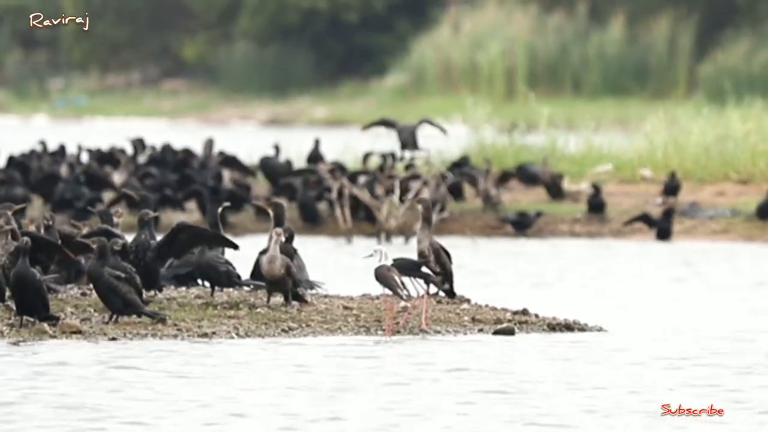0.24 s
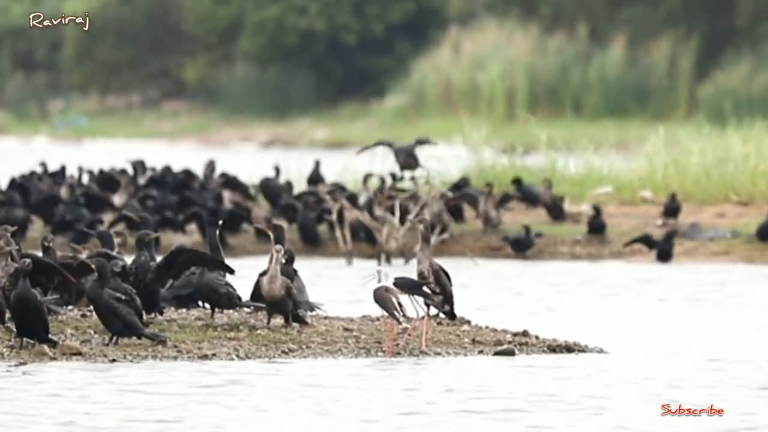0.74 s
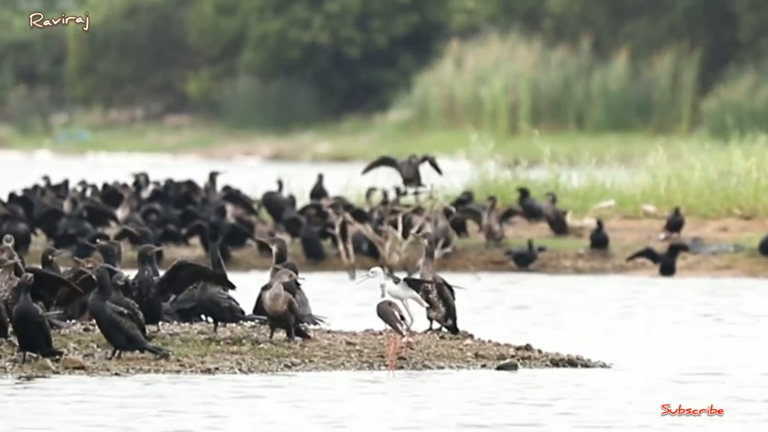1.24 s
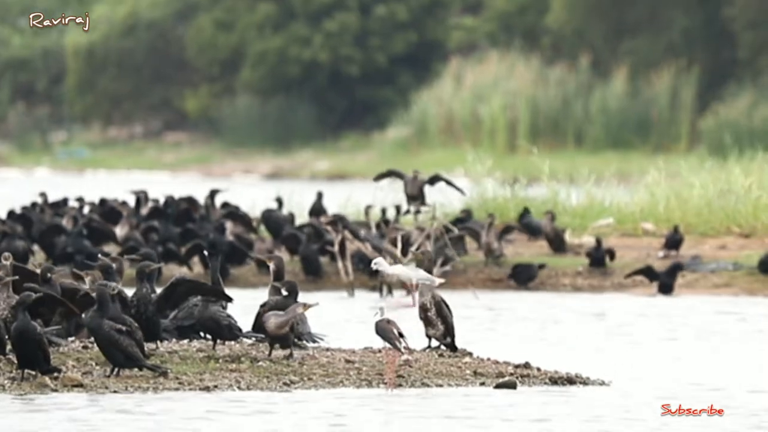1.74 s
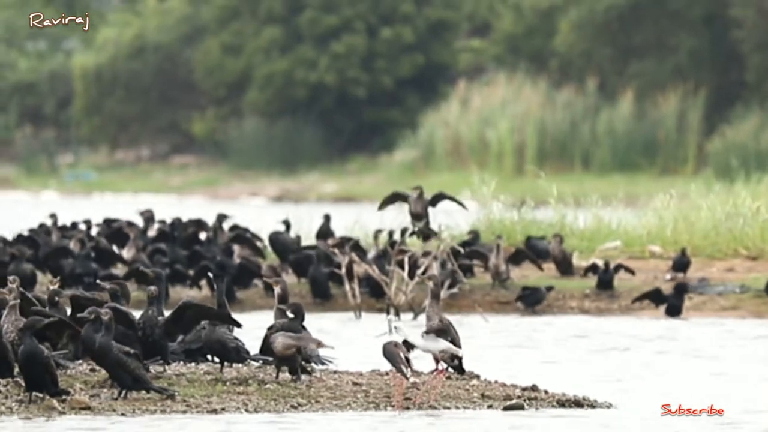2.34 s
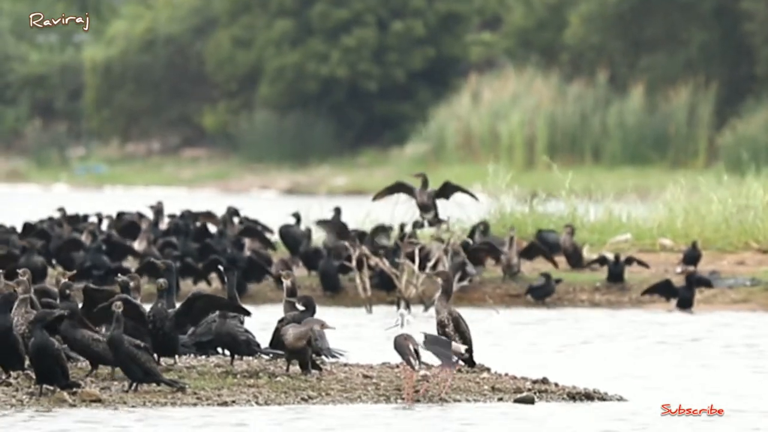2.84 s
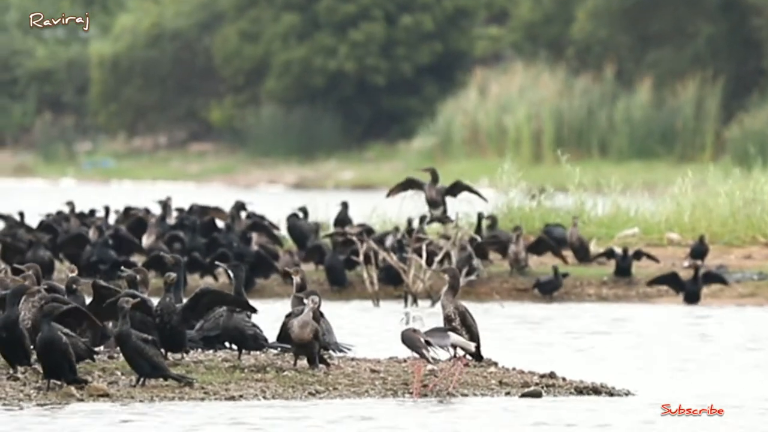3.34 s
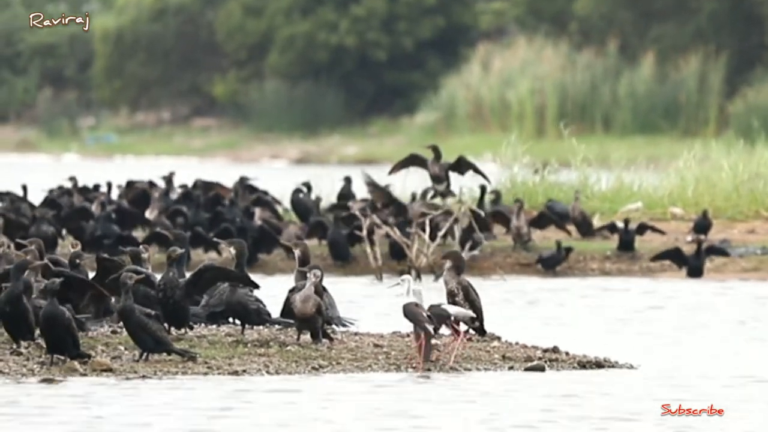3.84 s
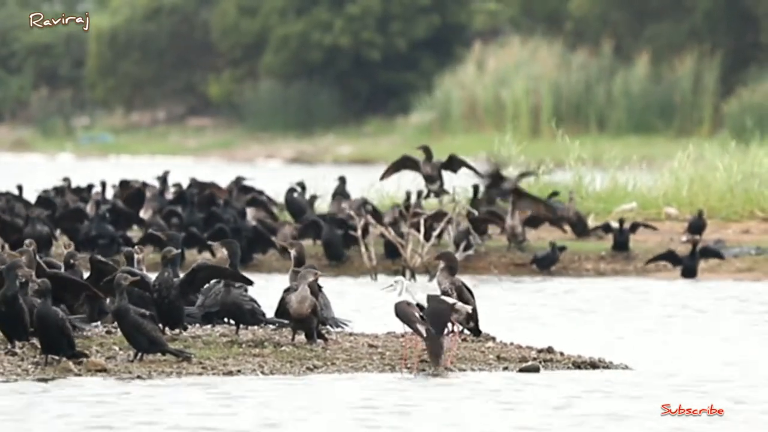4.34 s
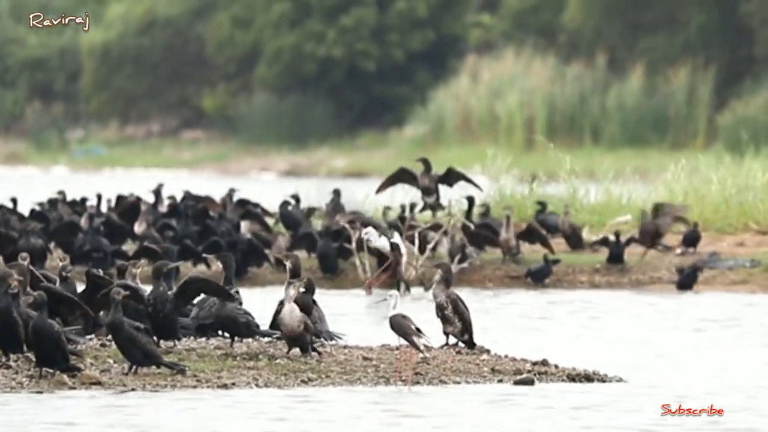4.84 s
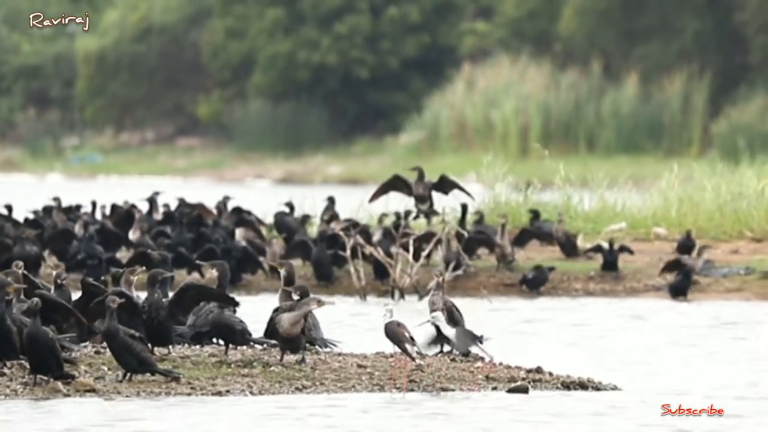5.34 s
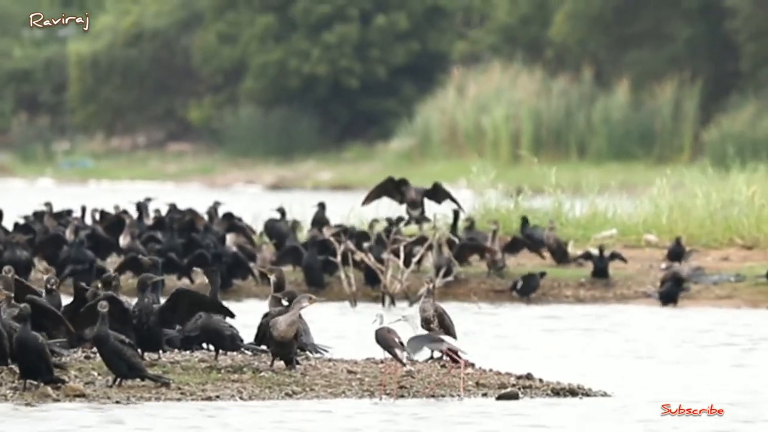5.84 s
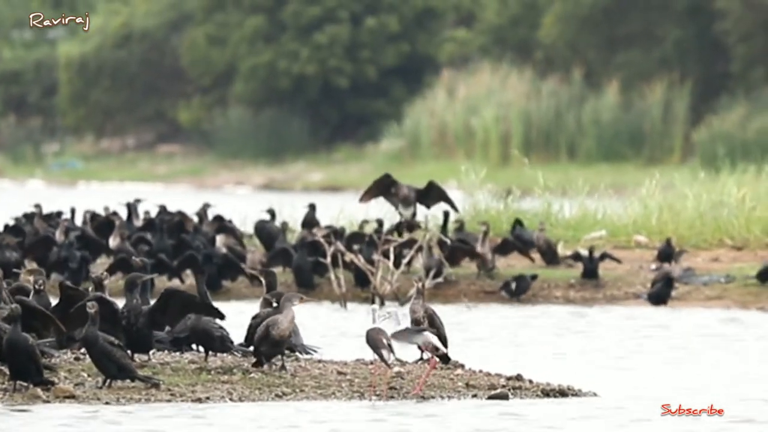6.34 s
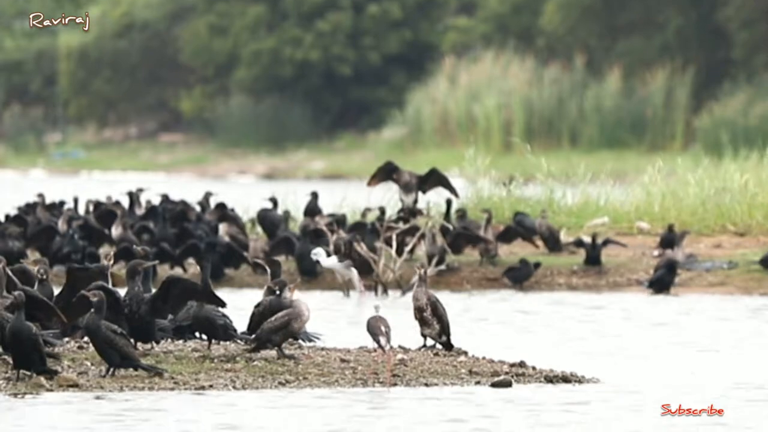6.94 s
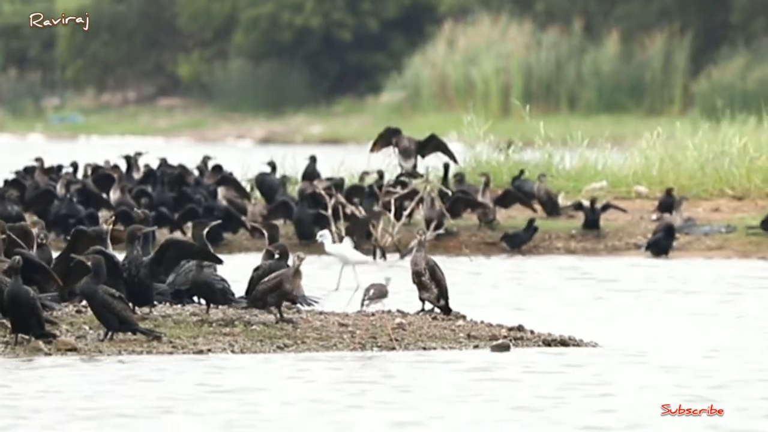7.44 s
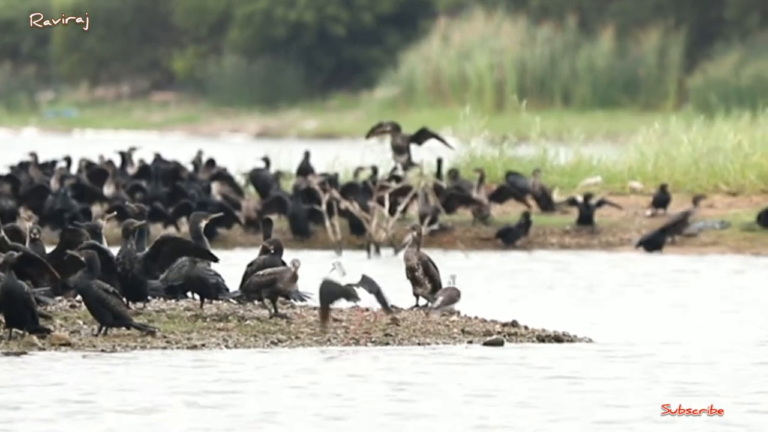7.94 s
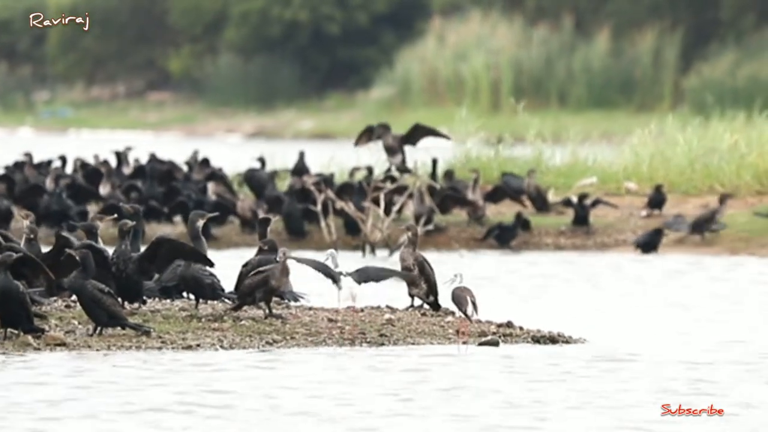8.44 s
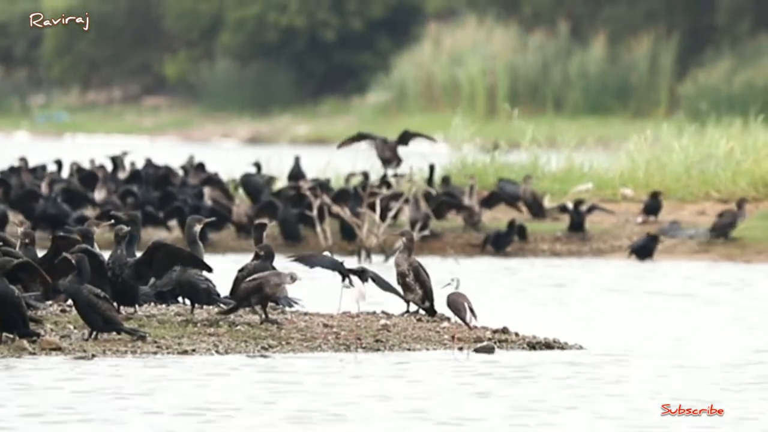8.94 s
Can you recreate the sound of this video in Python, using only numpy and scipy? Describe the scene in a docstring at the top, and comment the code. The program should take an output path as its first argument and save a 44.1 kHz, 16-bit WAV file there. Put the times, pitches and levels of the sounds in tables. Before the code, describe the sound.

Two long-legged wading birds quarrel close by with sharp yelps and fluttering rolled calls, over soft flock murmur and water, wind thudding the microphone.

```python
"""Lake shore, two long-legged waders quarrelling close by: a rolled call is already sounding at the start,
then arched yelps and fluttering rolls, both stacks of partials coloured by a throat, trade to the end.
Three dry taps fall, near 0.6, 3.7 and 5.2 s; gusts thud on the two ports of a camera microphone, hardest
from 1.3 to 1.65 s, as clusters of ringing pushes. From 2.2 s a small bird twitters far off in near-sines, again
from 5.1 s. Behind lie flock murmur, water and hiss (drifting random spectra) and a fuzzy band of insects."""
import sys
import numpy as np
from scipy import signal
from scipy.fft import rfft, irfft
from scipy.io import wavfile
from scipy.ndimage import uniform_filter1d

SR = 44100
rng = np.random.default_rng(int(sys.argv[2]) if len(sys.argv) > 2 else 0)


def generate_wav(signal):
    """Clip the signal to [-1, 1] and save it as 16-bit WAV at the path in sys.argv[1]."""
    frames = np.transpose(np.atleast_2d(signal))
    scaled = np.clip(frames, -1, 1) * 32767
    pcm = np.round(scaled).astype(np.int16)
    wavfile.write(sys.argv[1], SR, pcm)


N = 405719  # length in samples

# Near wader, yelps: start t/s, length t/s, rise to the top t/s, top level/dB, start f/Hz (before the scoop),
# top f/Hz (before the scoop), share of pitch lost in a register break, end f/Hz,
# extra treble above 3 kHz at the top level/dB per octave
YELP_CALLS = [ (0.398, 0.085, 0.041, -34.5, 1260, 1314, 0, 950, 3),
              (0.886, 0.091, 0.048, -33, 1154, 1295, 0.11, 1026, 14),
              (1.482, 0.097, 0.039, -34.5, 1340, 1422, .25, 762, 13.5),
              (1.811, 0.11, 0.047, -38.5, 974, 1163, 0, 770, 9),
              (2.376, 0.097, 0.033, -32.5, 990, 1113, 0, 770, 0.5),
              (2.877, 0.081, 0.041, -33.5, 1224, 1290, 0, 1100, 12.5),
              (3.23, 0.092, 0.047, -35.5, 1234, 1390, 0.26, 736, 8),
              (3.711, 0.093, 0.039, -36.5, 1302, 1364, 0, 983, 3.5),
              (4.194, 0.091, 0.027, -33.5, 1156, 1234, 0, 1030, 7.5),
              (4.657, 0.075, 0.036, -32.5, 1224, 1279, 0, 910, 8),
              (5.187, 0.091, 0.033, -33.5, 1316, 1462, 0.22, 790, 8.5),
              (5.547, 0.097, 0.03, -33.5, 1210, 1473, 0.17, 763.6, 10),
              (6.139, 0.069, 0.025, -31, 1133, 1400, 0, 930, 10.5),
              (6.576, .077, 0.046, -29, 1266, 1324, 0.34, 805, 13),
              (6.878, 0.08, 0.036, -30, 1403, 1463, 0.21, 950, 14),
              (7.266, 0.1, 0.019, -33.5, 1065, 1131, 0, 703, 8),
              (7.814, 0.099, 0.025, -35, 892, 1143, 0, 705, 6),
              (8.153, 0.1, 0.038, -33, 1340, 1483, 0.21, 685, 10),
              (8.591, 0.09, 0.044, -34, 1300, 1384, 0, 1046, 6.5),
              (9.004, 0.092, 0.045, -34, 1363, 1487, 0.3, 676, 10), ]
# Throat colour of the yelping bird: f/Hz, relative level/dB
YELP_THROAT_COLOUR = [(350, -53), (600, -14), (1080, -9.5), (1450, -11), (2020, 3), (2830, 0.5),
                      (3590, 0.5), (4510, -10.5), (5990, -21), (6480, -26.5), (9000, -77), (11700, -49),
                      (19800, -120)]
# Moments when a yelp turns hoarse: from t/s, to t/s
HOARSE_SPANS = [(1.51, 1.526), (5.212, 5.228), (6.622, 6.636), (1.815, 1.832), (2.386, 2.428)]
YELP_SWELL_DB, YELP_FADE_DB = 2.5, 8  # gained up to the top, lost after it
BREAK_DB, LOW_FADE_DB, BREAK_S = 5.5, 3.5, 0.0089  # the low register is quieter and fades less
YELP_RISE, YELP_FALL, LOW_FALL, FADE_CURVE = 2.08, 1.9, 1, 0.7  # powers of the arches
YELP_DULLING = 0.89  # treble lost, dB an octave, for each dB below the top


def yelp(start, length, rise_s, top_db, start_hz, top_hz, drop, end_hz, tilt_db):
    """Clean arches; in the high register strong and weak cycles alternate, adding lines at half the pitch."""
    u = np.arange(0, length, 1 / SR)
    t = start + u
    broken = drop > .1
    after_hz = top_hz * (1 - drop * broken)
    hz = arch(u, rise_s, start_hz, top_hz, after_hz, end_hz, YELP_RISE, LOW_FALL if broken else YELP_FALL)
    hz = uniform_filter1d(hz, size=70, mode="nearest")  # the break is a quick flip
    hz = hz * (1 - 0.056 * np.exp(-u / 0.0077))  # the voice scoops up to its pitch

    after_db = top_db - BREAK_DB * broken
    end_db = after_db - (LOW_FADE_DB if broken else YELP_FADE_DB)
    level_db = arch(u, rise_s, top_db - YELP_SWELL_DB, top_db, after_db, end_db, 1.0, FADE_CURVE)
    level_db = uniform_filter1d(level_db, round(BREAK_S * SR), mode="nearest")
    tilt_db = tilt_db - YELP_DULLING * (top_db - level_db)

    hoarse = sum((t > first) & (t < last) for first, last in HOARSE_SPANS)
    hoarse = uniform_filter1d(hoarse * 1., size=150)
    multiples = np.arange(2, 16) / 2
    half_db = -26 + 21 * np.clip((hz - 1170) / 130, 0, 1)  # half lines grow as the pitch climbs
    half_db = half_db + hoarse * (-3 - half_db)
    half_db = half_db - 7 * abs(multiples[:, None] - 2.6) - 1
    weights = np.where(multiples[:, None] % 1 > 0, amp(half_db), 1)
    voice = stack(hz, YELP_THROAT_COLOUR, tilt_db, multiples, weights, 0.14 + 0.26 * hoarse)
    return amp(level_db) * edges(t, 0.0037, 0.0053) * voice


# Near wader, rolled calls: start t/s, length t/s, opening level/dB, body level/dB, start f/Hz,
# rise to the top t/s, top f/Hz, end f/Hz, first shut of the throat after the start t/s, beats f/Hz,
# extra treble above 3 kHz level/dB per octave, clear opening t/s, depth of the roll 0-1
ROLLED_CALLS = [ (-.02, 0.087, -34.5, -37, 1215, 0.094, 1318, 1270, 0.0052, 46, -19, 0.027, 0.48),
                (0.932, 0.15, -46, -40, 1260, 0.012, 1264, 1134, 0.0036, 95, -2.5, .01, 0.6),
                (1.252, 0.2, -28.5, -40, 1196, 0.069, 1280, 1160, 0.0052, 79, 0, 0.037, 0.66),
                (1.604, .21, -28.5, -41.5, 1120, 0.056, 1290, 1117, 0.014, 91, 3.5, 0.033, 0.7),
                (2.023, .15, -28.5, -33.5, 960, 0.11, 1230, 1250, 0.0092, 81, -1, 0.037, 0.52),
                (2.467, 0.02, -34, -41, 980, 0.016, 1095, 1086, .0036, 82, -12, 0.018, .3),
                (2.739, 0.07, -26, -35, 962, 0.065, 1200, 1240, 0.0047, 88, -3.5, 0.032, 0.56),
                (3.387, 0.055, -31.5, -43, 985, 0.028, 1260, 1220, .0015, 79, -2, .033, .7),
                (4.255, 0.14, -32, -40, 1022, 0.048, 1115, 1040, 0.004, 72, -13, 0.022, 0.57),
                (4.385, 0.072, -40, -37.5, 1056, 0.03, 1057, 1002, 0.016, 82, -19, 0.0071, 0.65),
                (4.828, 0.14, -33.5, -40, 1102, 0.11, 1270, 1220, 0.0084, 78, 0, 0.021, 0.83),
                (4.978, .13, -34, -31.5, 1273, 0.022, 1280, 1090, 0.0018, 81, 6, 0.0076, 0.53),
                (5.307, 0.16, -28, -32.5, 1110, 0.021, 1110, 1056, 0.012, 85, 1.5, 0.029, 0.39),
                (6.523, 0.068, -26, -37, 1065, 0.025, 1106, 1140, 0.0042, 80, -2.5, 0.031, 0.9),
                (6.958, 0.046, -26.5, -52, 1124, .021, 1135, 1140, 0.0017, 90, 2, 0.018, 0.72),
                (7.009, 0.066, -35, -27, 1140, 0.063, 1220, 1205, 0.0071, 91, 2, 0.0056, 0.7),
                (7.096, .12, -35, -28.5, 1156, 0.06, 1205, 1180, 0.0086, 92, 5.5, 0.0049, 0.9),
                (7.23, 0.07, -30, -29, 1220, 0.0074, 1244, 1090, 0.003, 79, 4.5, 0.0043, 0.59),
                (7.451, .24, -27.5, -38.5, 1006, 0.15, 1172, 1100, 0.00054, 80, 5, 0.0308, 0.71),
                (9.179, 0.016, -31, -39, 880, 0.019, 1044, 1080, 0.0063, 75, -1.5, 0.0094, 0.5), ]
# Throat colour of the rolling bird: f/Hz, relative level/dB
ROLL_THROAT_COLOUR = [(530, -46), (900, -17), (1200, -8.5), (2300, 7), (3480, 1.5), (4150, -4), (4800, -5),
                      (5750, -5), (6700, -17), (9720, -50), (11100, -38), (13000, -60)]
# A second push of breath inside a rolled call: middle t/s, gain level/dB, half length t/s, depth taken away
BREATH_SURGES = [(1.035, 8, 0.035, 0.37), (1.76, 13, 0.061, 0.35), (4.35, 8, 0.026, 0.27),
                 (4.895, 10, 0.016, 0.68), (4.936, 13, 0.021, 0.2), (7.049, 4.5, 0.014, 0.28),
                 (7.145, 7, 0.0091, 0.73), (7.628, 13.5, 0.087, 0.29), (0.046, 3, 0.015, 0.18)]
OPENING_S, ROLL_FADE_DB, ROLL_FADE_CURVE = 0.043, 12.5, 3
ROLL_RISE, ROLL_FALL = 2.5, 1.1  # powers of the arch
PITCH_WAVER, DEPTH_WAVER = .007, .09  # chance wander: share of the pitch, and depth
DEEPER_PER_FADE_DB = .025  # the roll (depth 0-1) gets deeper with each dB of fade
HALF_PER_DEPTH, THINNING = .3, 0.59  # a deep roll splits the voice and leaves the third partial in front
PUFF_S, PUFF_DB = 0.0051, -13  # a faint hoarse puff comes before the voice sets in


def roll(start, length, opening_db, body_db, start_hz, rise_s, top_hz, end_hz,
         shut_s, per_s, tilt_db, clear_s, depth):
    """The throat flutters: each beat chokes the tone, a rasp slides up through the gap, the tone restarts split."""
    t = np.arange(0, length, 1 / SR)
    hz = arch(t, rise_s, start_hz, top_hz, top_hz, end_hz, ROLL_RISE, ROLL_FALL)
    hz = hz * (1 + PITCH_WAVER * drift(len(t), size=600))

    head_db = (opening_db - body_db) * np.exp(-(t / OPENING_S) ** 2)
    fade_db = ROLL_FADE_DB * (t / length) ** ROLL_FADE_CURVE
    surge_db, calm = sum([[db], [less]] * np.exp(-((start + t - s) / half_s) ** 2)
                         for s, db, half_s, less in BREATH_SURGES)
    level_db = body_db + head_db + surge_db - fade_db
    depth = depth - calm + DEEPER_PER_FADE_DB * fade_db
    depth = depth * (1 - np.exp(-(t / clear_s) ** 6))  # the opening stays clear
    depth = np.clip(depth + DEPTH_WAVER * drift(len(t), size=700), 0, 1)

    beats = per_s * (t - shut_s) + .04 * drift(len(t), size=500)
    beat = beats % 1
    luck = rng.random((2, 40))[:, np.floor(beats).astype(int) % 40]  # one pair of draws per beat
    choke = np.exp(-(np.minimum(beat, 1 - beat) / (0.12 + .2 * depth)) ** 2)
    throb = 1 - np.clip(1.6 * depth, 0, .97) * choke
    throb = throb / np.sqrt(uniform_filter1d(throb ** 2, size=540))
    throb = throb * amp(4.4 * depth * uniform_filter1d(luck[0] - .5, size=60))  # uneven beats
    restart = uniform_filter1d(np.exp(-beat / .28) * (.6 + .7 * luck[1]), size=40)
    restart = restart * np.clip(1.5 * depth, 0, 1)

    multiples = np.arange(2, 24) / 2
    puff = np.clip((PUFF_S - t) * 1000 + .5, 0, 1)
    split = puff + HALF_PER_DEPTH * depth + 0.45 * restart
    split = split * np.exp(-((multiples[:, None] - 3.1) / 1.7) ** 2)  # half lines near the throat peak
    whole = 1 - THINNING * depth * (multiples[:, None] != 3)
    weights = np.where(multiples[:, None] % 1 > 0, split, whole)
    fuzz = .08 + .27 * depth + puff
    tone = stack(hz * (1 - .09 * restart), ROLL_THROAT_COLOUR, tilt_db, multiples, weights, fuzz)
    voice = throb * tone + rasp(hz, tilt_db, beats, depth, luck[1])
    return amp(level_db + PUFF_DB * puff) * edges(t, 0.0023, 0.0062) * voice


# The lead and span are shares of a beat, the sag a share of the pitch
RASP_LEAD, RASP_SPAN, RASP_SAG, RASP_DB = .12, .6, .18, -1.5


def rasp(hz, tilt_db, beats, depth, luck):
    """A rough group of upper partials that starts before each shut of the throat and slides up in pitch."""
    slip = np.clip((beats + RASP_LEAD) % 1 / RASP_SPAN, 0, 1)
    sliding_hz = hz * (1 - RASP_SAG * (1 - slip))
    multiples, weights = np.array([3, 3.5, 4, 5]), [[1], [.4], [1], [.3]]
    rough = stack(sliding_hz, ROLL_THROAT_COLOUR, tilt_db, multiples, weights, .33)
    strength = np.clip(2 * depth, 0, 1) * uniform_filter1d(0.63 + 0.7 * luck, size=90)
    return amp(RASP_DB) * strength * np.sin(np.pi * slip) * rough


def stack(hz, throat, tilt_db, multiples, weights, fuzz):
    """Partials of the syrinx coloured by the throat; each shimmers a little on its own."""
    order = multiples[:, None]
    turns, partial_hz = np.cumsum(hz) / SR, order * hz
    treble_db = tilt_db * np.log2(np.maximum(partial_hz / 3000, 1))
    gains = amp(read(throat, partial_hz) + treble_db) * weights
    gains = gains * amp(2.4 * drift(gains.shape, size=450))  # the beak moves: partials swell in turn
    gains = gains / np.sqrt((gains ** 2).sum(0) / 2)
    shimmer = 1 + fuzz * (drift(gains.shape, size=30) + 1j * drift(gains.shape, size=30))
    waves = -np.exp(1j * order * (2 * np.pi * turns - 0.12 * order))
    return (gains * shimmer * waves).real.sum(0)


def arch(u, rise_s, start, top, after, end, up, down):
    """Climbs from start to top, then sinks from after to end."""
    climb = np.clip(1 - u / rise_s, 0, 1)
    sink = np.clip((u - rise_s) / (u[-1] - rise_s + 1e-4), 0, 1)
    return np.where(u < rise_s, top - (top - start) * climb ** up, after - (after - end) * sink ** down)


# Rumble of the wind at the microphone: t/s, level/dB
GUST_LEVELS = [(0, -44.5), (1.2, -47), (1.3, -30), (1.65, -34.5), (1.85, -61.5), (2.3, -55.5), (3.4, -48),
               (3.7, -42), (3.9, -53), (4.3, -45.5), (4.7, -48), (5.3, -45.5), (5.55, -50), (6.25, -51),
               (6.43, -39), (6.8, -47.5), (7.9, -42), (8.1, -46.5), (9.2, -46)]
# Strong eddies on the ports: middle t/s, level/dB, left-right level/dB, length t/s (window is 2.2 times this,
# 4000 samples at most), f/Hz
EDDY_THUDS = [(0.288, -30, 5, 0.024, 264), (0.564, -26.5, 10, 0.05, 289), (0.711, -33.5, -1, 0.017, 128),
              (0.824, -30.5, 6, 0.038, 178), (1.011, -24, 13.5, 0.0066, 280), (1.03, -28.5, 13, 0.013, 214),
              (1.287, -22.5, 17.5, 0.0098, 262), (1.313, -23, -1, 0.01, 230),
              (1.326, -21.5, 14, 0.0065, 404), (1.338, -18.5, 5, 0.011, 290), (1.355, -15.5, 3, 0.019, 276),
              (1.385, -26, 14, 0.0059, 374), (1.394, -21.5, 11, .01, 223), (1.404, -30, -13, 0.007, 327),
              (1.434, -26, 15.5, .008, 304), (1.478, -16, 9, .014, 202), (1.496, -28, -17.5, 0.0057, 396),
              (1.508, -22.5, -14, 0.0122, 230), (1.524, -27.5, -9, 0.009, 181),
              (1.605, -23.5, -14.5, 0.014, 258), (1.64, -26, -12, 0.008, 270),
              (1.655, -29, -7, 0.0094, 195), (3.491, -30.5, 7, 0.033, 149), (3.66, -31, 10, 0.039, 176),
              (3.724, -28.5, 11, 0.05, 228), (4.225, -26.5, 8, 0.047, 200), (4.317, -33, -11, 0.0291, 147),
              (4.362, -28.5, -9, 0.028, 190), (5.215, -37.5, 24, 0.054, 163), (5.261, -26, 19.5, 0.05, 172),
              (5.33, -25.5, 10, 0.036, 253), (5.387, -28, 9, 0.025, 241), (6.41, -24, 5, 0.0389, 112),
              (6.434, -20.5, 13.5, 0.05, 288), (6.704, -28, 7.5, 0.037, 140), (7.337, -30.5, 8, 0.03, 223),
              (7.356, -27.5, 12.5, .007, 292), (7.372, -30, 11, 0.0083, 273), (7.783, -27, 4.5, 0.05, 203),
              (8.613, -33, 10, 0.02, 210)]
# Colour of the rumble: f/Hz, relative level/dB per Hz
WIND_COLOUR = [(12, -80), (20, -31.5), (95, -4), (198, -2.5), (275, -6), (394, -8.5), (1500, -44.5),
               (1950, -60), (3300, -120)]


def wind():
    """A lumpy rumble on each port; strong eddies are short clusters of pushes, each ringing a cycle or two."""
    s, level_db = np.transpose(GUST_LEVELS)
    t, hz = np.arange(N) / SR, np.fft.rfftfreq(N, 1 / SR)
    own, shared = rng.standard_normal((2, N)), rng.standard_normal(N)
    lumps = amp(1.25 * drift((2, N), size=500) + 2.2 * drift(N, size=900))
    rumble = evened(irfft(rfft((own + 1.75 * shared) * lumps) * amp(read(WIND_COLOUR, hz)), N))
    out = rumble * amp(np.interp(t, s, level_db) + np.array([[1.2], [-1.2]]))
    draws = rng.random((len(EDDY_THUDS), 3, 4000))
    for (middle, db, pan_db, length, thud_hz), draw in zip(EDDY_THUDS, draws):
        burst = eddy(length, thud_hz, draw)
        power = uniform_filter1d(burst ** 2, size=600).max(1, keepdims=True)
        port_db = db + np.array([[.5], [-.5]]) * pan_db
        add(out, middle - len(eddy_window(length)) / 2 / SR, amp(port_db) * burst / np.sqrt(power))
    return out


def eddy_window(length):
    """The swell and ebb of one cluster of pushes."""
    return np.hanning(min(round(2.2 * length * SR), 4000))


def eddy(length, thud_hz, draw):
    """Pushes at chance moments, partly shared by the ports, each ringing briefly at the thud's pitch."""
    window, u = eddy_window(length), np.arange(1200) / SR
    draw = draw[:, :len(window)]
    pushes = (draw < 250 / SR) * (draw * SR / 125 - 1)  # about 250 a second, heights from -1 to 1
    pushes[:, len(window) // 2 - 80] = 0.65  # one sure push near the middle
    pushes = (pushes[:2] + 0.11 * pushes[2]) * window
    turns = thud_hz * u
    push = turns ** 1.94 * np.exp(-turns / 0.23) * np.cos(2 * np.pi * turns)
    burst = signal.fftconvolve(pushes, push[None], axes=1)
    bass_cut = signal.butter(2, 0.35 * thud_hz, "high", fs=SR, output="sos")
    return signal.sosfilt(bass_cut, burst)  # small eddies lack bass


# Phrase of the far bird: t/s from its start, f/Hz, relative level/dB
TWITTER_PHRASE = [(0, 3710, -2), (.008, 4330, 1), (.018, 4170, -2), (.021, 4850, -6), (.027, 4730, -4),
                  (.037, 4290, 4), (.044, 4550, -6), (.052, 4630, 4.5), (.068, 3070, -1)]
# Far twitters: start t/s, level/dB
TWITTER_STARTS = [(2.176, -49.5), (2.555, -53.5), (2.964, -49.5), (5.086, -52), (5.44, -55), (5.769, -54),
                  (6.107, -50), (6.418, -51)]
# Thin single whistles: start t/s, length t/s, start f/Hz, end f/Hz, level/dB
THIN_WHISTLES = [(2.478, .02, 6700, 6140, -53), (3.616, 0.098, 5200, 4340, -49.5)]
# Dry taps: start t/s, level/dB of the tone before its decay, f/Hz
DRY_TAPS = [(0.627, -34.5, 1680), (3.661, -32.5, 1390), (5.163, -29.5, 1490)]


def far_birds():
    """Near-sine twitters and whistles, with three dry taps."""
    out = np.zeros(N)
    t, hz, shape_db = columns(TWITTER_PHRASE)
    for s, db in TWITTER_STARTS:
        add(out, s, amp(db + shape_db) * edges(t, .003, 0.0027) * sweep(hz))
    for s, length, start_hz, end_hz, db in THIN_WHISTLES:
        glide = np.linspace(start_hz, end_hz, round(length * SR))
        add(out, s, amp(db) * signal.windows.tukey(len(glide), .6) * sweep(glide))
    u = np.arange(900) / SR
    for s, db, tap_hz in DRY_TAPS:
        crack = .3 * drift(len(u), size=5) * np.exp(-u / .007)
        knock = np.sin(2 * np.pi * tap_hz * u) * np.exp(-u / 0.0034)
        add(out, s, amp(db) * np.clip(u / 0.00035, 0, 1) * (crack + knock))
    return out


def echoes(x):
    """Scatter from water and reeds: a short tail of sparse taps, other taps for each port."""
    t = np.arange(6000) / SR
    sparse = rng.standard_normal((2, len(t))) * (rng.random((2, len(t))) < .05)
    taps = sparse * amp(-60 * t / 0.11) * (t > .002)
    return signal.oaconvolve(x[None], taps / np.linalg.norm(taps[0]), axes=1)[:, :N]


# Colour of the shore: f/Hz, relative level/dB per Hz
SHORE_COLOUR = [(18, -57), (30, -28), (53, -17.5), (243, -5), (277, -2.5), (379, -15.5), (575, -10.5),
                (747, -6), (1440, -7.5), (1720, -11.5), (3400, -17), (3770, -18), (4190, -17),
                (8710, -27.5), (15500, -47)]
# Likeness of the two ports: f/Hz, left-right likeness (1 is the same)
PORT_LIKENESS = [(100, 1), (500, 0.76), (1500, 0.011), (4000, 0.036), (10000, 0.043)]
SHORE_DB = -46


def shore():
    """Flock murmur, water and far hiss: random short-time spectra with drifting patches."""
    frames, hz = N // 256 + 5, np.fft.rfftfreq(1024, 1 / SR)
    a, b, c, d, patches = rng.standard_normal((frames, 513, 5)).T
    patches = evened(uniform_filter1d(uniform_filter1d(patches, size=10, axis=0), size=10, axis=1))
    same = np.clip(read(PORT_LIKENESS, hz), -1, 1)[:, None]
    left = a + 1j * b
    right = same * left + np.sqrt(1 - same ** 2) * (c + 1j * d)
    level_db = read(SHORE_COLOUR, hz)[:, None] + 1.52 * patches + 0.058 * drift(frames, size=40)
    spectra = np.array([left, right]) * amp(level_db)
    return amp(SHORE_DB) * evened(signal.istft(spectra, nperseg=1024, noverlap=768)[1][:, :N])


# Slow swell of the insects: t/s, level/dB
INSECT_LEVELS = [(0.0, -63), (1.53, -65.5), (1.9, -62.5), (2.46, -67), (5.3, -68), (5.84, -64),
                 (9.2, -62.5)]
INSECT_HZ, INSECT_WIDTH_HZ = 8720, 610


def insects():
    """A fuzzy high band of noise that swells slowly."""
    hz = np.fft.rfftfreq(N, 1 / SR)
    bell = np.exp(-((hz - INSECT_HZ) / INSECT_WIDTH_HZ) ** 2)
    band = irfft(rfft(rng.standard_normal((2, N))) * bell, N)
    swell_db = np.interp(np.arange(N) / SR, *np.transpose(INSECT_LEVELS))
    return amp(swell_db + 1.8 * drift(N, size=2000)) * evened(band)


def amp(db):
    """Level in dB to amplitude."""
    return 10 ** (np.asarray(db) / 20)


def evened(x):
    """Scales to rms 1."""
    return x / np.sqrt(np.mean(x ** 2) + 1e-20)


def read(points, hz):
    """Reads a curve between its points on a log frequency scale."""
    f, value = np.transpose(points)
    return np.interp(np.log(hz + 1), np.log(f + 1), value)


def add(mix, s, sound):
    """Lays a sound into the mix at s seconds, trimmed at both ends."""
    sound = sound[..., max(-round(s * SR), 0):]
    part = mix[..., max(round(s * SR), 0):][..., :len(sound.T)]
    part += sound[..., :len(part.T)]


def drift(shape, size):
    """Slow chance of rms 1."""
    return evened(uniform_filter1d(uniform_filter1d(rng.standard_normal(shape), size), size))


def columns(rows):
    """Joins the rows at audio rate, corners slightly rounded."""
    s, *rest = np.transpose(rows)
    t = np.arange(s[0], s[-1], 1 / SR)
    return [t] + [uniform_filter1d(np.interp(t, s, c), size=200, mode="nearest") for c in rest]


def edges(t, rise, fall):
    """Straight fades at both ends, in seconds."""
    return np.clip((t - t[0]) / rise, 0, 1) * np.clip((t[-1] - t) / fall, 0, 1)


def sweep(hz):
    """A sine that follows a moving pitch."""
    return np.sin(2 * np.pi * np.cumsum(hz) / SR)


# The left port lags: f/Hz, lag in radians
LEFT_LAG = [(2500, 0.18), (5500, 0.57), (9000, 1)]
# Balance of the ports: f/Hz, left-right level/dB
LEFT_RIGHT_TILT = [(2400, -1), (4400, 2)]


def ports(x):
    """The two microphone ports differ in level and phase along the frequency scale."""
    hz, side = np.fft.rfftfreq(N, 1 / SR), np.array([[.5], [-.5]])
    response = amp(side * read(LEFT_RIGHT_TILT, hz)) * np.exp(-1j * side * read(LEFT_LAG, hz))
    return irfft(rfft(x) * response, N)


def scene():
    """The waders and far birds through the ports, their echoes, then shore, insects and wind."""
    yelps, rolls, far = np.zeros(N), np.zeros(N), far_birds()
    for row in YELP_CALLS:
        add(yelps, row[0], yelp(*row))
    for row in ROLLED_CALLS:
        add(rolls, row[0], roll(*row))
    direct = yelps * amp([[.3], [-.3]]) + rolls + far * amp([[1.5], [-1.5]])  # left and right gains, dB
    return ports(direct) + amp(-12) * echoes(yelps + rolls + far) + shore() + insects() + wind()


EDGE_HZ = 15650


def record(dry):
    """The low cut of the microphone, then the band limit."""
    cut = signal.sosfilt(signal.butter(2, 45, "high", fs=SR, output="sos"), dry)
    band_limit = signal.firwin(2047, EDGE_HZ, window=("kaiser", 9), fs=SR)
    return signal.oaconvolve(cut, band_limit[None], "same")


dry = scene()
out = record(dry)
generate_wav(out)
```